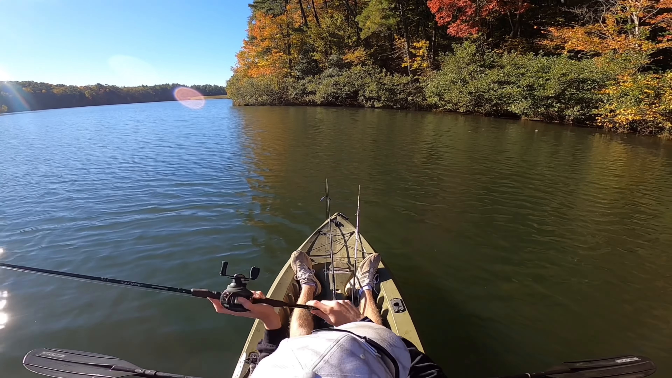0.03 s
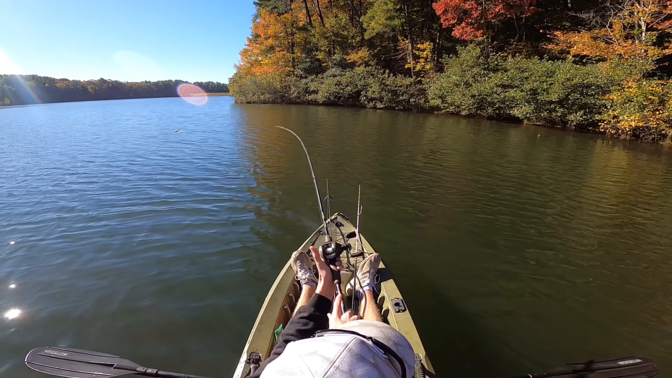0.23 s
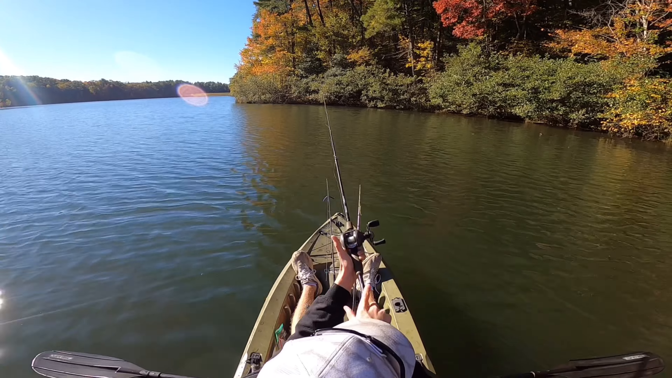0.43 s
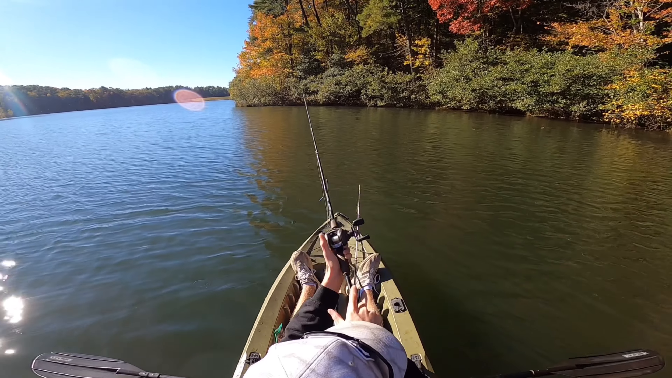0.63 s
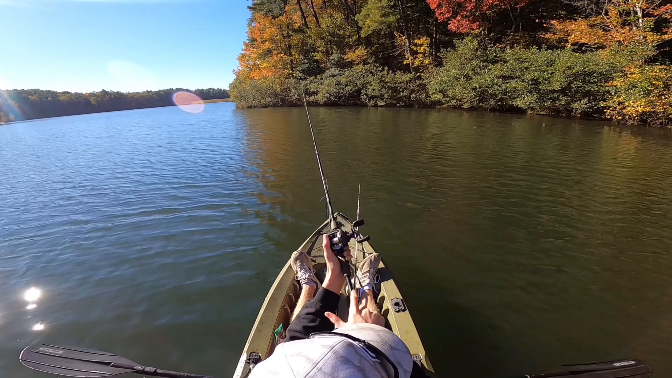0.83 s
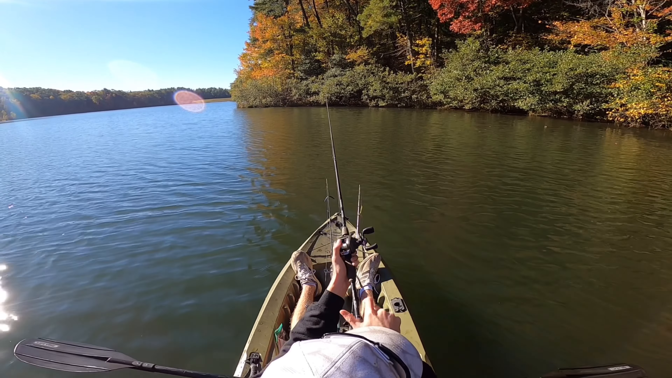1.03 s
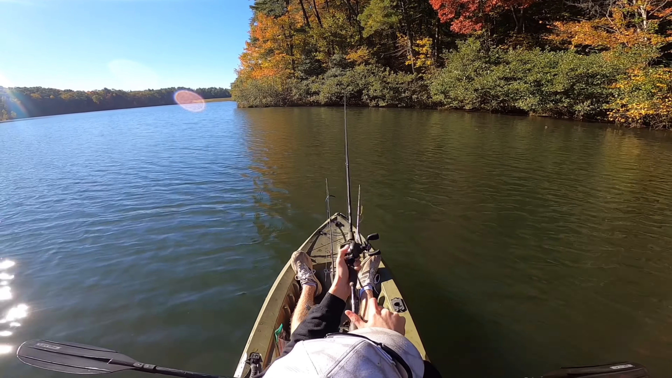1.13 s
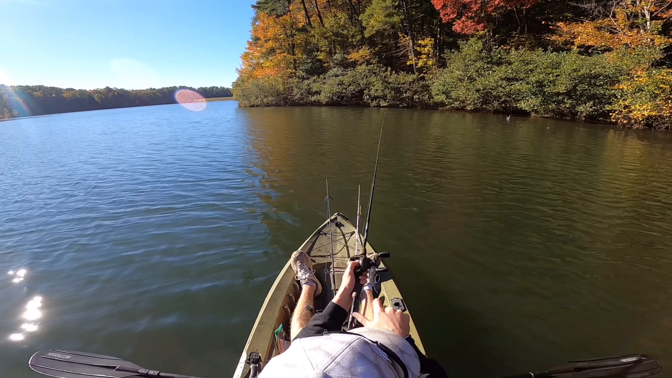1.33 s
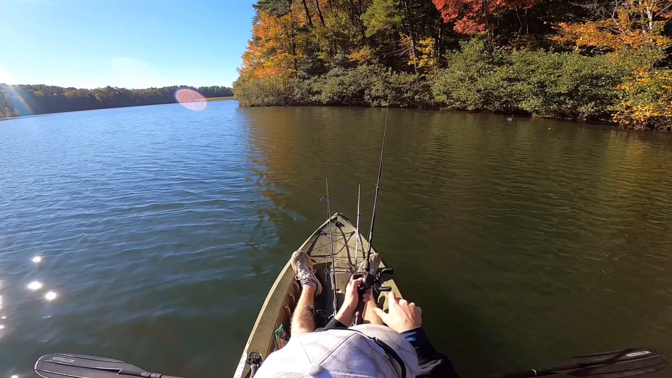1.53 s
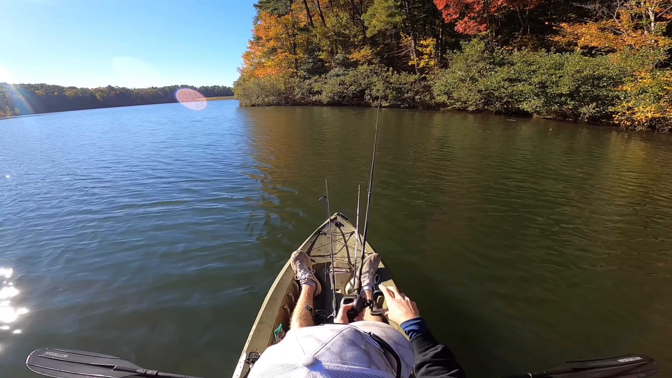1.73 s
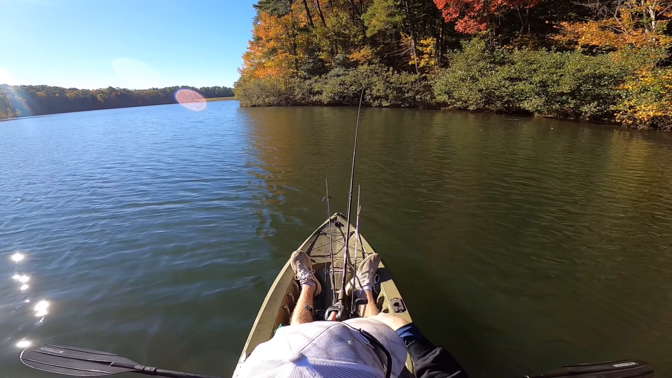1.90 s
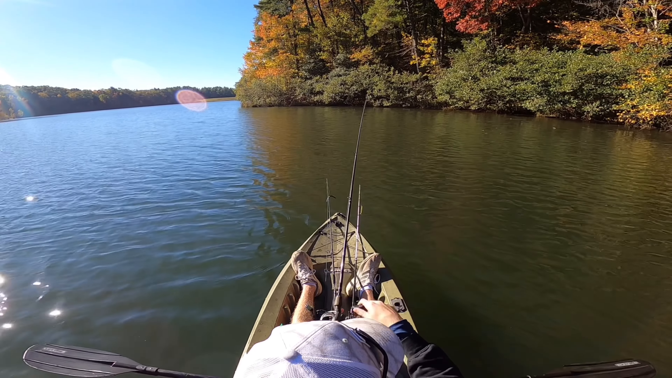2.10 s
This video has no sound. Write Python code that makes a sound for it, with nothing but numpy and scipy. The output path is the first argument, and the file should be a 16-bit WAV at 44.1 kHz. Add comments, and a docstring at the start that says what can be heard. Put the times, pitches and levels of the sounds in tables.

```python
"""Casting from a kayak on a calm lake

A cast with a baitcasting reel, heard from just above the hands over quiet air and lapping water.
The rod swishes and whistles as shaped noise; the thumb lets go and line slaps the guides.
The spool whirs up and coasts down: its speed drives line hiss, a rub once a turn and a hum.
The lure plops as rising bubbles, resonances snap the clutch shut, and slow winding begins as noise."""
import sys
import numpy as np
from scipy import signal
from scipy.fft import rfft, irfft
from scipy.io import wavfile
from scipy.ndimage import uniform_filter1d, minimum_filter1d

SR = 44100
rng = np.random.default_rng(int(sys.argv[2]) if len(sys.argv) > 2 else 0)


def file_out(sig):
    """Save sig as 16-bit WAV at sys.argv[1]."""
    # one column per channel
    cols = np.atleast_2d(sig).T
    # limit, then scale
    lim = np.clip(cols, -1, 1)
    pcm = np.round(lim * 32767).astype(np.int16)
    wavfile.write(sys.argv[1], SR, pcm)


N = 92610
T = np.arange(N) / SR
CLUTCH_S = 1.8055  # the clutch snaps shut and winding begins

# Spectra below list (frequency [Hz], relative level per hertz [dB]); noise() sets their rms to 1.
# narrow resonances of the reel frame: (frequency [Hz], width [Hz], boost [dB])
REEL_FRAME = [(2454, 150, 3), (2630, 130, 2), (3330, 90, 3.5), (3560, 140, 4.5), (4060, 130, 2),
              (4630, 79, 0), (4845, 90, 3), (6340, 120, -0.5), (6900, 470, 3)]
# soft rustle spectrum: (frequency [Hz], relative level per hertz [dB])
RUSTLE_SPECTRUM = [(500, -12.5), (1500, -16), (3000, -6.5), (4200, -15), (5100, 1), (6200, -6.5),
                   (8000, -8.5), (9000, -27.5), (15000, -50)]
# bright spectrum of small metal parts: (frequency [Hz], relative level per hertz [dB])
TICK_SPECTRUM = [(300, -26), (800, -21.5), (1300, 1.5), (2500, 9.5), (4000, 1.5), (8000, -4.5),
                 (10000, -11), (15000, -30)]


def from_db(db):
    """Turn decibels into an amplitude factor."""
    return 10 ** (np.asarray(db) / 20)


def rms_one(x):
    """Scale a signal to rms 1."""
    return x / np.sqrt(np.mean(x ** 2) + 1e-20)


def at_hz(points, hz):
    """Read a spectrum on a log-frequency axis."""
    p = np.array(points)
    return np.interp(np.log(hz + 1), np.log(p[:, 0]), p[:, 1])


def colour(x, spectrum, peaks=()):
    """Shape a sound by a spectrum and narrow resonances, then scale it to rms 1."""
    hz = np.arange(N // 2 + 1) * SR / N
    db = at_hz(spectrum, hz)
    for centre, width, boost in peaks:
        db = db + boost / (1 + (2 * (hz - centre) / width) ** 2)
    return rms_one(irfft(rfft(x) * from_db(db), N))


def noise(spectrum, peaks=()):
    """Coloured noise of rms 1."""
    return colour(rng.standard_normal(N), spectrum, peaks)


def drift(rate_hz):
    """Slow random wander of rms 1: noise through two equal low-pass poles."""
    step = 40  # samples between computed points
    r = np.exp(-2 * np.pi * rate_hz * step / SR)
    settle = 2000  # points dropped while the filter settles
    raw = rng.standard_normal(N // step + 2 + settle)
    slow = signal.lfilter([1], [1, -2 * r, r * r], raw)[settle:]
    return np.interp(np.arange(N) / step, np.arange(len(slow)), rms_one(slow))


def dying(start, decay):
    """Sudden start, then exponential decay."""
    return (T >= start) * np.exp(-np.maximum(T - start, 0) / decay)


def swell(start, top):
    """Envelope that rises to 1 after top seconds, then dies."""
    u = np.maximum(T - start, 0) / top
    return (u * np.exp(1 - u)) ** 2


def mode(start, hz, db, top):
    """One resonance that swells and dies."""
    return from_db(db) * swell(start, top) * np.sin(2 * np.pi * hz * (T - start))


def lake(width=0.67):
    """Wide noise of open air, and a swaying narrow band of water murmuring against the hull."""
    # open air: (frequency [Hz], relative level per hertz [dB])
    air_spectrum = [(25, -46), (55, -4), (90, -11), (170, 0), (260, -8), (400, -11), (650, -18.5),
                    (900, -18), (1250, -9.5), (1750, -16.5), (2500, -15), (3500, -19), (5200, -22.5),
                    (7000, -29.5), (10000, -40), (14000, -43), (15500, -56)]
    opposite_sides = np.array([[1], [-1]])
    air = from_db(-56.5) * (noise(air_spectrum) + width * noise(air_spectrum) * opposite_sides)
    lap_hz, lap_db, sway_db = 166.2, -63, 2
    band = signal.butter(2, [lap_hz / 1.19, lap_hz * 1.174], "band", fs=SR, output="sos")
    lap = signal.sosfilt(band, rng.standard_normal(N))
    return air + from_db(lap_db) * rms_one(lap * from_db(sway_db * drift(6.2)))


def sleeve():
    """A sleeve rustles as the swing begins: soft noise dying away."""
    return noise(RUSTLE_SPECTRUM) * from_db(-51.5) * dying(0, 0.05)


def knocks():
    """Dull knocks of the rod grip and hull, one resonance each."""
    # (start [s], frequency [Hz], peak level [dB], time to the top [s])
    knock_list = [(0.039, 152, -46.5, 0.027), (0.182, 62, -49, 0.011), (.222, 334, -34.5, 0.0093),
                  (.233, 392, -28, 0.0076), (0.274, 516, -28, 0.0026), (.285, 71.2, -55, .016),
                  (1.69, 118, -43.5, 0.0066)]
    return sum(mode(*knock) for knock in knock_list)


def zips():
    """Quick falling zips: sines whose pitch decays exponentially, trailing off in a rustle."""
    # (start [s], level [dB])
    zip_list = [(.040, -44.5), (1.680, -47)]
    start_hz, fall_s, top_s = 7500, 0.007, 0.004
    rustle_db, rustle_decay_s = -4, 0.054  # level relative to the zip
    rustle = noise(RUSTLE_SPECTRUM)
    out = 0
    for start, db in zip_list:
        # The cycle count decays along with the pitch, its rate of change.
        cycles = start_hz * fall_s * dying(start, fall_s)
        tone = swell(start, top_s) * np.sin(2 * np.pi * cycles)
        tail = from_db(rustle_db) * rustle * dying(start, rustle_decay_s)
        out = out + from_db(db) * (tone + tail)
    return out


def swish():
    """The rod swings through the air: broad noise rising and falling."""
    # loudness of the swing: (time [s], level [dB])
    level = [(.1, -72), (.165, -53), (.195, -41), (.218, -30), (.238, -29), (.258, -34.5), (.29, -36),
             (.36, -65)]
    # rushing air: (frequency [Hz], relative level per hertz [dB])
    spectrum = [(59, -51), (100, 0.5), (513, -13.5), (923, -6), (1490, 0.5), (1660, -3), (1960, -5),
                (3840, -4), (8700, -14.5), (13200, -33), (15000, -64)]
    return noise(spectrum) * from_db(np.interp(T, *np.transpose(level), left=-np.inf, right=-np.inf))


def whistle():
    """A breathy tone shed by the thin rod tip, its pitch climbing as the tip speeds up."""
    # (time [s], centre frequency [Hz], level [dB])
    tip_path = [(.125, 4220, -62), (0.166, 5640, -49.5), (0.192, 6850, -45), (0.219, 7900, -54)]
    s, hz, db = np.transpose(tip_path)
    phase = 2 * np.pi * np.cumsum(np.interp(T, s, hz)) / SR
    low_pass = signal.butter(2, 550, fs=SR, output="sos")  # Hz to either side of the centre
    breath = signal.sosfilt(low_pass, rng.standard_normal((2, N)))
    tone = rms_one(breath[0] * np.sin(phase) + breath[1] * np.cos(phase))
    return tone * from_db(np.interp(T, s, db, left=-np.inf, right=-np.inf))


def ticks():
    """Small ticks of the reel, and the sharp slap of the lure striking the water: bursts of bright noise with
    sudden starts."""
    # (start [s], level [dB], decay [s]); the burst at 1.5383 s is the lure slapping the water
    tick_list = [(.1425, -46.5, .002), (1.3832, -38, 0.013), (1.5383, -36.5, 0.0013),
                 (1.768, -41.5, 0.0038), (1.784, -35, 0.003), (1.7943, -33, 0.0029), (1.7982, -37, 0.0074),
                 (1.803, -25.5, 0.0061)]
    return noise(TICK_SPECTRUM) * sum(from_db(db) * dying(s, decay) for s, db, decay in tick_list)


def line_slaps():
    """Line slips under the thumb and slaps the guides: noise bursts that set resonances ringing."""
    # (start [s], level [dB], decay [s])
    slaps = [(0.2397, -16, 0.00087), (0.2414, -14, 0.004)]
    # slipping line: (frequency [Hz], relative level per hertz [dB])
    slip_spectrum = [(300, -34), (800, -22), (1500, -16.5), (2400, 4), (3100, -13.5), (3600, -6), (4350, 0),
                     (5150, 4), (5900, -14), (6350, 7.5), (6900, 10), (7600, -14.5), (8700, -15),
                     (10600, -24.5), (12400, -7), (15500, -43)]
    # guide resonances: (frequency [Hz], level over the slap [dB], time to the top [s])
    guide_modes = [(4355, -7.5, 0.0007), (5140, -3.5, 0.00066), (6320, -4.5, 0.0012), (6860, -1.5, .0012)]
    bursts = noise(slip_spectrum) * sum(from_db(db) * dying(s, decay) for s, db, decay in slaps)
    guides = sum(mode(s, hz, db + over_db, top) for s, db, _ in slaps for hz, over_db, top in guide_modes)
    return bursts + guides


def dulled(x, speed):
    """Let the treble fall further than the rest as the spool slows."""
    low = signal.sosfiltfilt(signal.butter(2, 4820, fs=SR, output="sos"), x)  # treble starts here, Hz
    return low + (x - low) * speed ** 0.24


def spool():
    """Spool speed drives the line's hiss, one rub per turn and the hum of its unbalance."""
    # speed while the line pulls the spool up: (time [s], speed [turns per s])
    spin_up = [(.255, 185), (.294, 252), (0.329, 283), (0.363, 287), (0.393, 320), (0.42, 299.5)]
    # line running off: (frequency [Hz], relative level per hertz [dB])
    hiss_spectrum = [(120, -21), (300, -25), (450, -23), (740, -41), (920, -6), (1280, -6), (1650, -1.5),
                     (1900, -7), (2450, 0.5), (3000, -2), (3700, -1), (4500, 3.5), (5000, 0), (5600, -2.5),
                     (6350, 2), (7000, 3.5), (8100, -13.5), (9700, -13), (12700, -17.5), (14400, -24),
                     (15500, -43.5)]
    # rubbing contact: (frequency [Hz], relative level per hertz [dB])
    rub_spectrum = [(240, -26.5), (450, -20.5), (780, -18.5), (1000, -10), (1600, -11), (1950, -5.5),
                    (2500, -1), (2950, -2.5), (3450, 2), (4000, -3), (4800, -10), (5500, -10),
                    (6400, -11.5), (7000, -3.5), (7700, -4), (9400, -11.5), (12500, -21.5), (15500, -45)]
    # hum orders 1, 2, ... per turn at full speed: level [dB]
    hum_levels = [-41, -50.5, -51.5, -42.5, -48, -45.5, -44.5]
    coast_per_s, full_speed_hz = 1.315, 290
    release_s, rise_s, stop_s, stop_fade_s = 0.251, 0.053, 1.375, 0.033
    slack_s, slack_db_per_s = 1.108, 28  # the line goes slack and the whirr weakens
    # Levels at full speed, and powers of speed they follow.
    hiss_db, hiss_power, hiss_flicker_db = -20.5, 2.27, 0.5
    rub_db, rub_power, rub_spread_db = -26, 1.3, 1.5
    rub_sharpness, rub_wander_turns = 1.7, 0.024  # the touching point shifts from turn to turn
    hum_power, hum_waver_db = 3.97, 1.22  # waver grows with the square root of the order

    s, rate = np.transpose(spin_up)
    hz = np.interp(T, s, rate) * np.exp(-coast_per_s * np.maximum(T - s[-1], 0))
    turns = np.cumsum(hz) / SR
    speed = hz / full_speed_hz
    pull = np.where(T < s[-1], np.maximum(speed, 1), speed)  # the line is taut while it drives the spool
    fade_in = np.clip((T - release_s) / rise_s, 0, 1)
    fade_out = np.clip((stop_s - T) / stop_fade_s + 1, 0, 1)
    slack = from_db(-slack_db_per_s * np.maximum(T - slack_s, 0))

    flicker = from_db(hiss_db + hiss_flicker_db * drift(40))
    hiss = noise(hiss_spectrum, REEL_FRAME) * flicker * pull ** hiss_power

    # Each turn draws its own strength and presses hardest once.
    strength = from_db(rub_spread_db * rng.standard_normal(N))[turns.astype(int)]
    angle = 2 * np.pi * (turns + rub_wander_turns * drift(90))
    contact = rms_one(np.exp(-rub_sharpness * np.cos(angle)) * strength)
    rub = colour(contact * rng.standard_normal(N), rub_spectrum, REEL_FRAME)
    rub = rub * from_db(rub_db) * speed ** rub_power

    hum = 0
    for order, db in enumerate(hum_levels, 1):
        level = from_db(db + hum_waver_db * np.sqrt(order) * drift(49))
        hum = hum + level * np.sin(2 * np.pi * (order * turns + rng.random()))
    hum = np.sqrt(2) * hum * (speed * pull) ** (hum_power / 2)  # sqrt(2): hum levels are rms
    return fade_in * fade_out * slack * (dulled(hiss + rub, pull) + hum)


def plop():
    """Bubbles where the lure lands: brief sines that rise in pitch."""
    # (start [s], starting frequency [Hz], peak level [dB])
    bubbles = [(1.541, 1160, -44), (1.555, 1320, -45.5), (1.570, 1790, -49), (1.601, 1110, -52),
               (1.644, 1840, -43.5), (1.696, 1150, -45), (1.728, 1210, -49)]
    top_s, bend_per_s = 0.0029, 14  # pitch climbs by twice the bend
    out = 0
    for start, hz, db in bubbles:
        age = T - start
        cycles = hz * age * (1 + bend_per_s * age)
        out = out + from_db(db) * swell(start, top_s) * np.sin(2 * np.pi * cycles)
    return out


def clutch():
    """The clutch snaps shut: modes that start together, a grip thud, a noise crack and a noisy ring."""
    # snap resonances: (frequency [Hz], peak level before the bass cut [dB], time to the top [s])
    snap_modes = [(1250, -24, 0.0015), (1625, -16.5, 0.0016), (2177, -10, 0.0013), (2550, -12.5, 0.0013),
                  (3250, -15.5, 0.00093), (3840, -15, 0.00063), (5000, -15.5, 0.0013), (5610, -17, 0.0014),
                  (6570, -17.5, 0.00091), (7440, -14, 0.00086), (8520, -13.5, 0.00043),
                  (10800, -24.5, 0.00053), (13000, -27, 0.00054)]
    # thud of the grip: (frequency [Hz], peak level [dB], time to the top [s])
    grip_thud = (485, -40, 0.0034)
    # ring: (frequency [Hz], relative level per hertz [dB])
    ring_spectrum = [(300, -14), (800, -12.5), (1250, -1.5), (1900, -8), (2400, 4), (2800, -2), (3600, -26),
                     (7500, -22), (10000, -47), (15000, -45)]
    snap = sum(mode(CLUTCH_S, *row) * (-1) ** k for k, row in enumerate(snap_modes))
    # The small parts radiate no bass.
    snap = signal.sosfilt(signal.butter(4, 1080, "high", fs=SR, output="sos"), snap)
    thud = mode(CLUTCH_S, *grip_thud)
    crack = noise(TICK_SPECTRUM) * from_db(-16.5) * dying(CLUTCH_S, 0.0039)
    ring = noise(ring_spectrum) * from_db(-32.5) * dying(CLUTCH_S, 0.019)
    return snap + thud + crack + ring


def winding():
    """Slow winding: softly flickering noise through the reel frame's resonances."""
    # (frequency [Hz], relative level per hertz [dB])
    spectrum = [(400, -21), (900, -10), (1300, 5), (1800, -3), (2400, 4), (3500, -7), (6000, -10),
                (9000, -19), (15000, -32)]
    level_db, flicker_db = -57, 2
    return noise(spectrum, REEL_FRAME) * from_db(level_db + flicker_db * drift(25)) * (T > CLUTCH_S)


def microphones(x, scatter_db, scatter_s):
    """The left side hears later and duller; boat and body scatter a little treble sideways."""
    # left level over right: (frequency [Hz], difference [dB])
    left_shade = [(200, 2.5), (1000, -1.2), (2400, 0), (4500, -0.6), (8000, -1), (11000, -9.5),
                  (15000, -14)]
    left_lag_s, scatter_from_hz = 3.4e-5, 500
    hz = np.arange(N // 2 + 1) * SR / N
    half_shade_db = at_hz(left_shade, hz) / 2
    left = from_db(half_shade_db) * np.exp(-2j * np.pi * hz * left_lag_s)
    right = from_db(-half_shade_db)
    echoes = rfft(rms_one(rng.standard_normal(N) * dying(0, scatter_s))) / np.sqrt(N)
    scatter = from_db(scatter_db) * echoes * hz / (hz + scatter_from_hz)
    return irfft(rfft(x) * np.array([left * (1 + scatter), right * (1 - scatter)]), N)


def scene():
    """Place the whirr and the handling sounds in stereo over the lake."""
    handling = sleeve() + knocks() + zips() + swish() + whistle() + ticks() + line_slaps()
    handling = handling + plop() + clutch() + winding()
    whirr = microphones(spool(), scatter_db=-9, scatter_s=0.016)
    return lake() + whirr + microphones(handling, scatter_db=-10, scatter_s=0.003)


def record(dry):
    """A fast limiter turns both sides down around high peaks, then the top is cut."""
    limit, limit_s, cutoff_hz = 0.85, 0.002, 16800
    size = int(limit_s * SR)
    allowed = limit / np.maximum(np.abs(dry).max(axis=0), limit)
    gain = uniform_filter1d(minimum_filter1d(allowed, size=2 * size), size=size)
    return signal.sosfilt(signal.cheby2(14, 70, cutoff_hz, fs=SR, output="sos"), dry * gain)


dry = scene()
out = record(dry)
file_out(out)
```